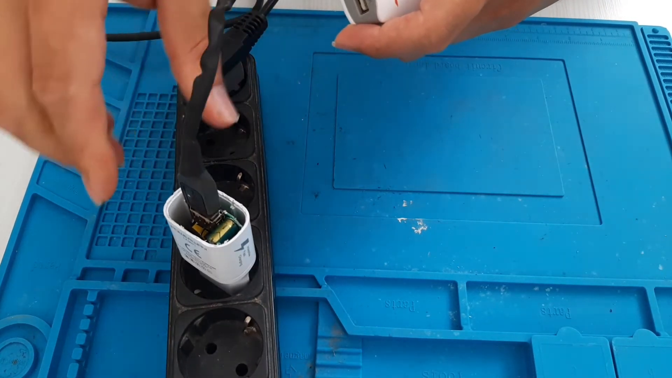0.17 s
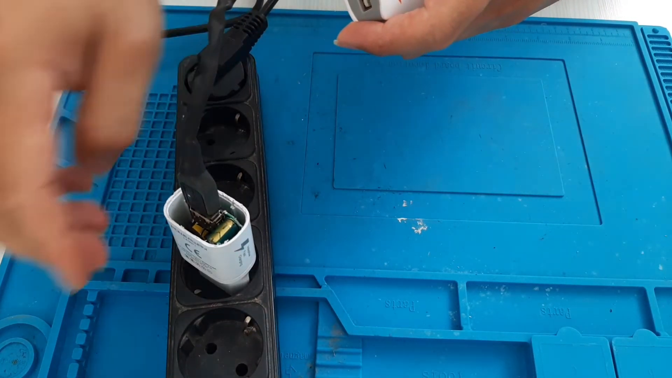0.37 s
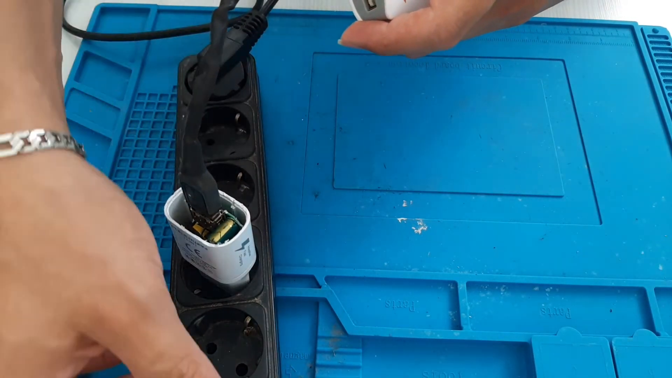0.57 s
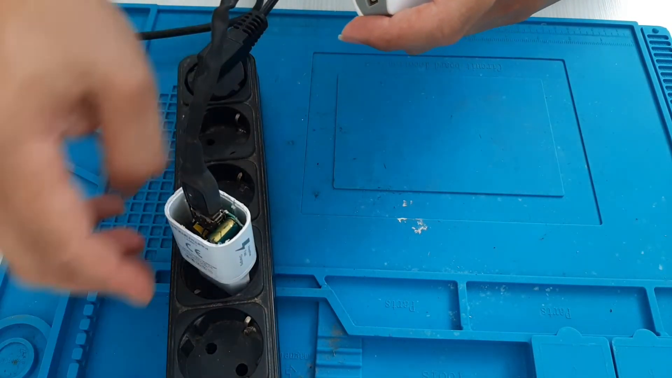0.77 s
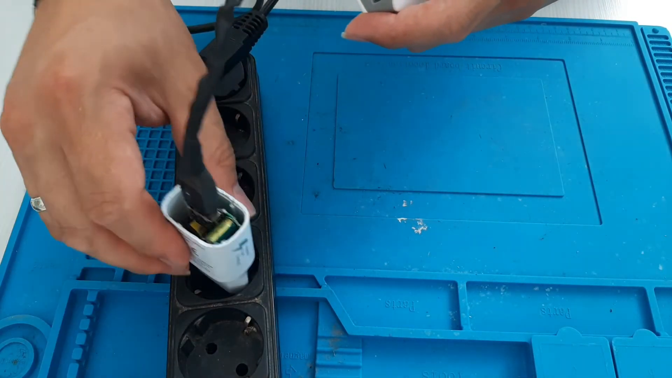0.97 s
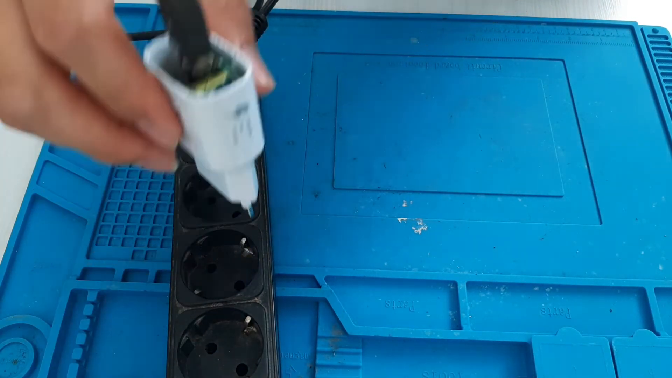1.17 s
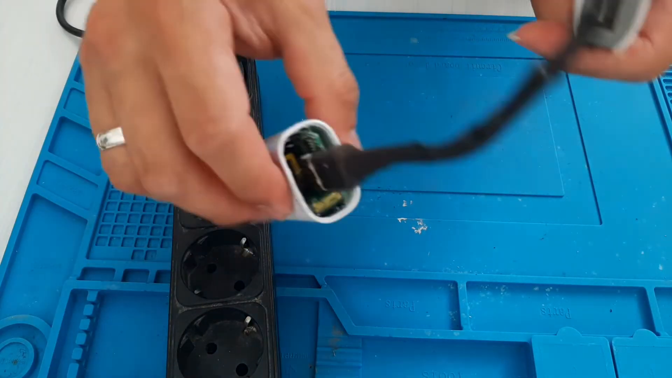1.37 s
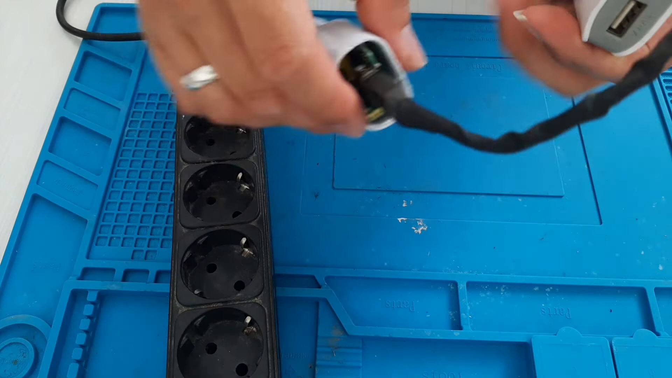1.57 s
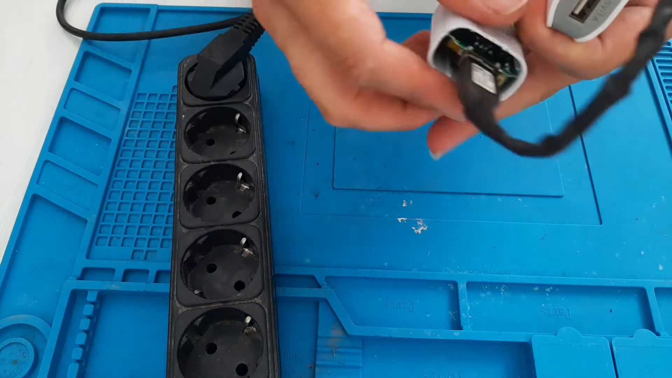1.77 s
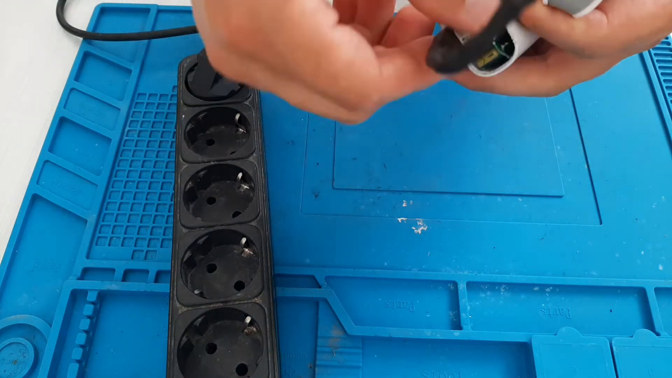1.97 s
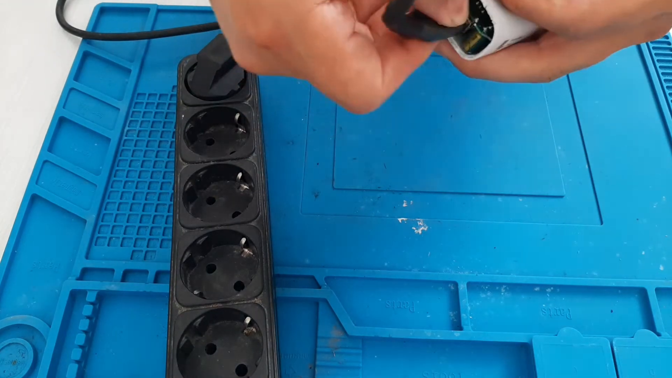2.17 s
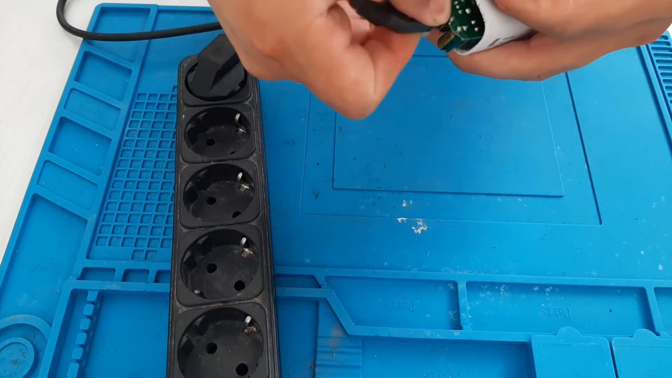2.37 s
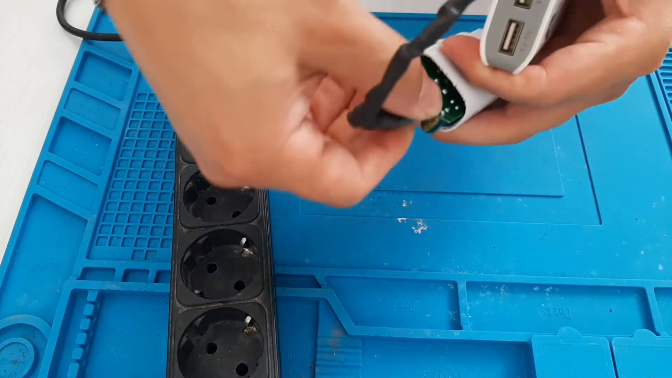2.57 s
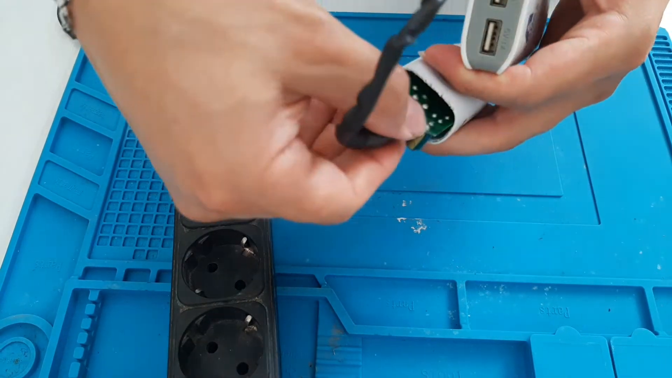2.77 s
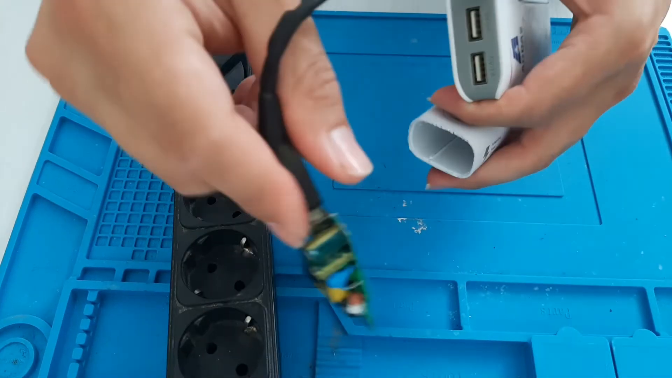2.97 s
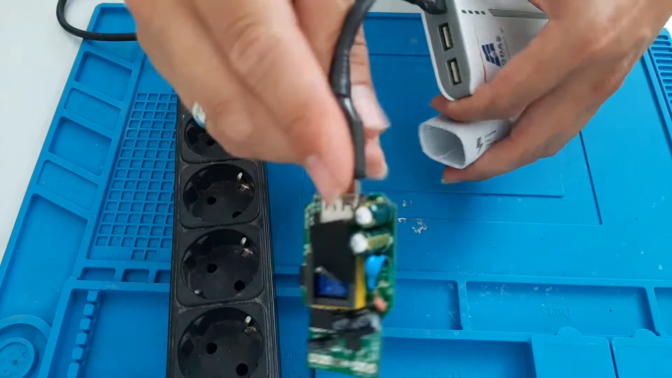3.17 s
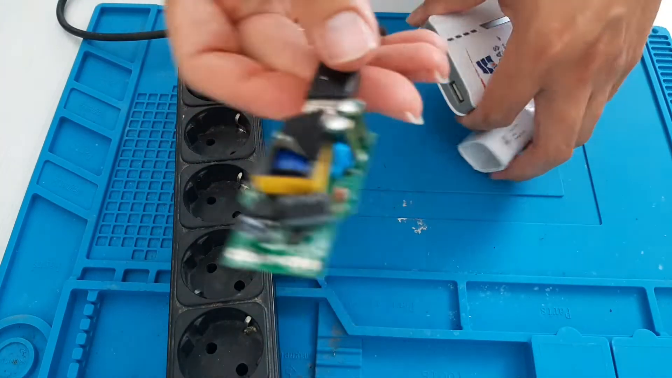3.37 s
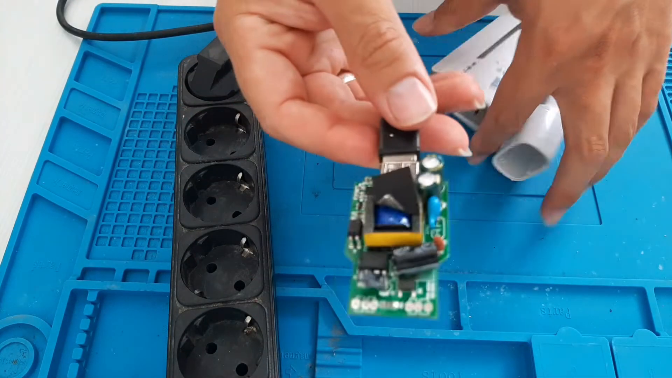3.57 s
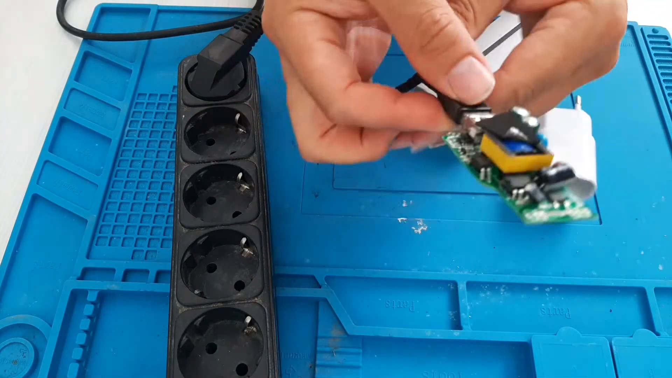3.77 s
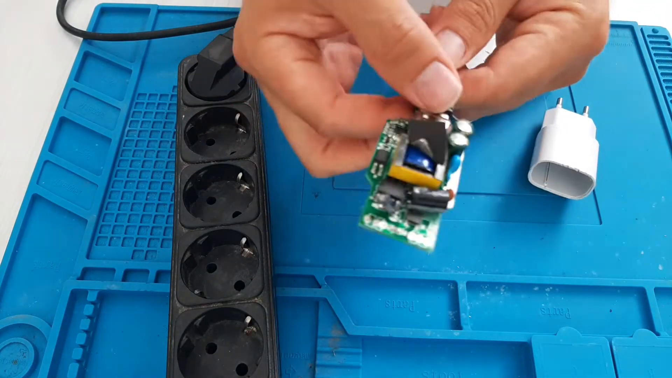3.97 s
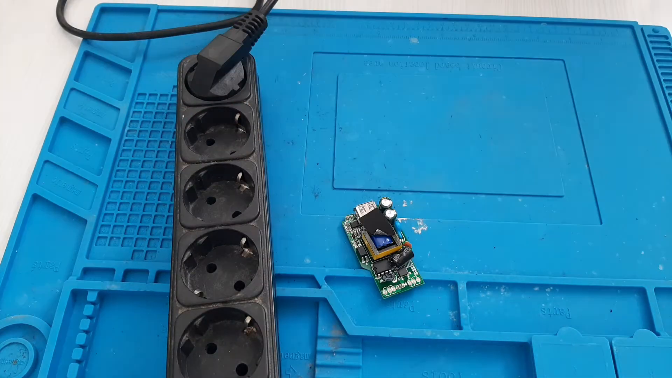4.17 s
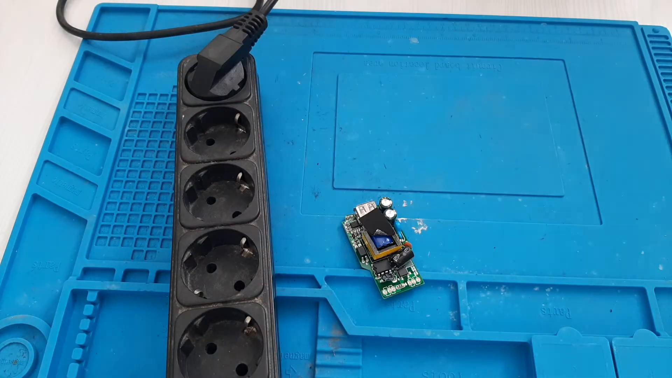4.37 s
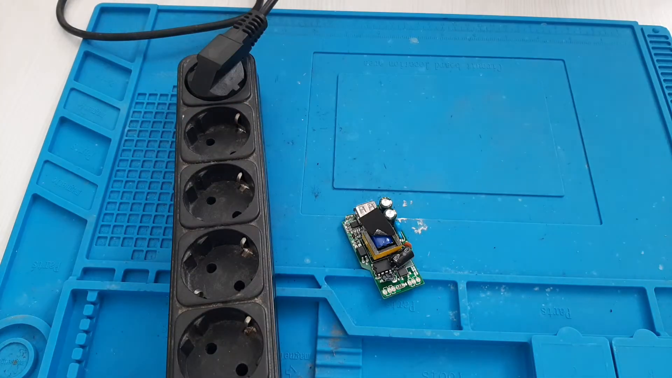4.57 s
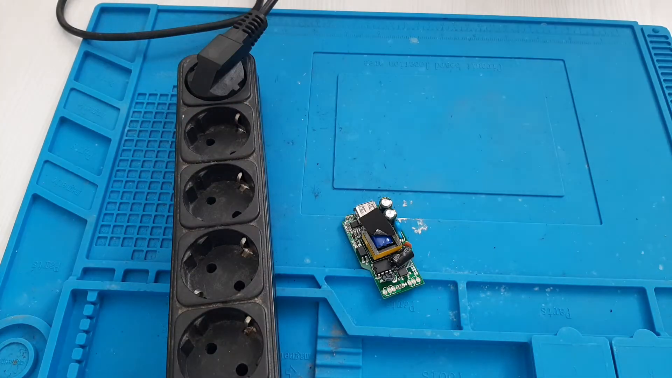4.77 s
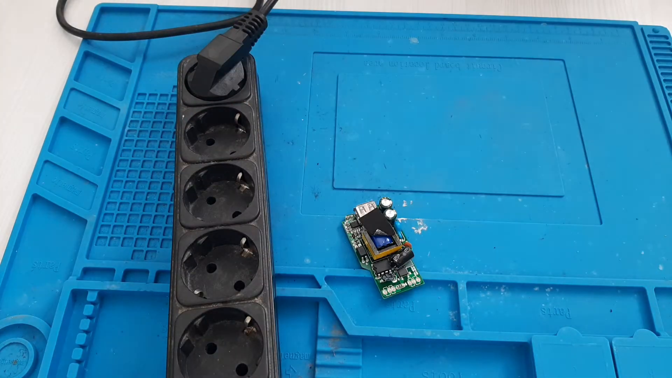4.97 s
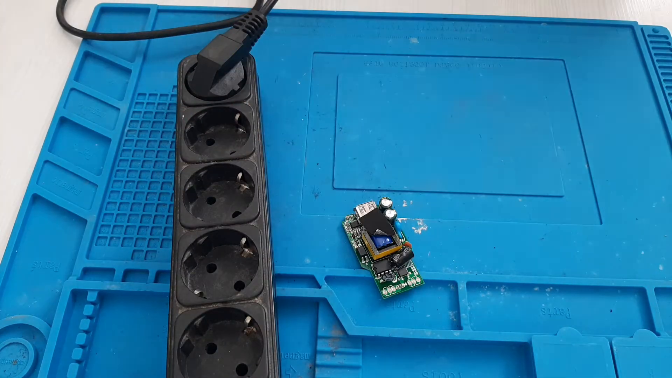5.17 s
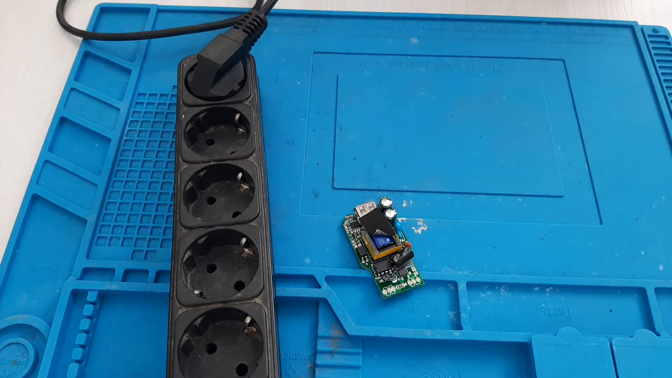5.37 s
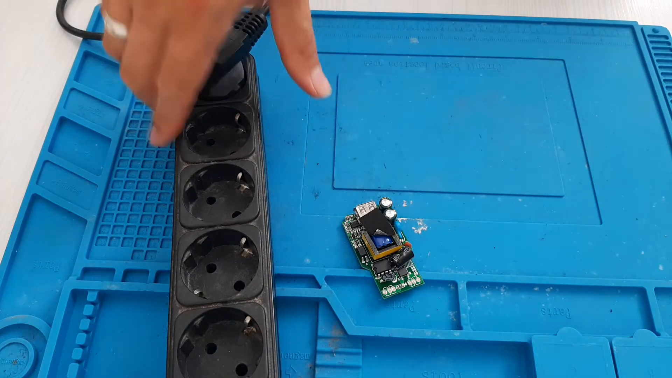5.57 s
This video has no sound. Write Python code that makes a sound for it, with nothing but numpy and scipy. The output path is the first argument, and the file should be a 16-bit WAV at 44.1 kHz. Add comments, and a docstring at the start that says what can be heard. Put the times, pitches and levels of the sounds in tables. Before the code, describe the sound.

Close up in a quiet room, a small charger sizzles with a thin, high electrical noise for about a second, then is pulled from a power strip with a scrape and click. Faint handling ticks follow, then sharp hollow plastic clacks as the board leaves its case. The case is set down with ringing knocks and soft bumps, and the board lands with hard clicks. A two-microphone phone picks it up with short room echoes.

```python
"""The hollow plastic case of a small charger and its circuit board are tapped, scraped and set down
on a bench: rough noise bursts and gritty noise drive resonances of cavity, shell, board and bench.
Before that the charger sizzles in a power strip until it is pulled out: noise coloured by its parts.
Soft bench bumps, a brief low hum, room echoes and room tone lie beneath, all heard close to a
two-microphone phone in a quiet room."""
import sys
import numpy as np
from scipy import signal
from scipy.fft import rfft, irfft
from scipy.io import wavfile
from scipy.ndimage import uniform_filter1d

SR = 44100
rng = np.random.default_rng(int(sys.argv[2]) if len(sys.argv) > 2 else 0)


def int16_out(signal):
    """Quantize to a 16-bit WAV file."""
    q = np.round(np.clip(np.atleast_2d(signal).T, -1, 1) * 32767)
    wavfile.write(sys.argv[1], SR, q.astype(np.int16))


N = 248402
T = np.arange(N) / SR
SIDES = np.array([[.5], [-.5]])  # shares a left-minus-right level [dB] between the two microphones


def undb(db):
    """Amplitude factor of a level in dB."""
    return 10 ** (np.asarray(db) / 20)


def unit(x):
    """Scale to an overall RMS of 1."""
    return x / np.sqrt(np.mean(x ** 2))


def peak(x, db):
    """Scale so that the highest peak lies 1 dB above the given level."""
    return x * undb(db + 1.0) / np.abs(x).max()


def band(x, lo_hz, hi_hz):
    """Gentle band-pass."""
    return signal.sosfilt(signal.butter(2, [lo_hz, hi_hz], "band", fs=SR, output="sos"), x)


def ring(x, modes):
    """Sum of decaying resonances (frequency [Hz], gain [dB], t60 [s]) driven by x."""
    out = 0
    for hz, db, t60 in modes:
        radius = 1000 ** (-1 / (max(t60, 1 / 1000) * SR))
        angle = 2 * np.pi * hz / SR
        resonance = signal.lfilter([1], [1, -2 * radius * np.cos(angle), radius * radius], x)
        out = out + undb(db) * np.sin(angle) * resonance
    return out


def walk(rate):
    """Random levels held for 1 / rate seconds and smoothed twice; spread near 1."""
    hold = int(SR / rate)
    steps = np.repeat(rng.standard_normal(N // hold + 1), hold)
    return 1.3 * uniform_filter1d(uniform_filter1d(steps, hold), hold)[:N]


def tinted(gain):
    """Unrelated noise for each microphone, with gain(Hz) as its colour."""
    hz = np.arange(N // 2 + 1) * SR / N + 1
    return unit(irfft(rfft(rng.standard_normal((2, N))) * gain(hz), N))


def hands(s):
    """Where the hands work at time s: pan and share sent to the room, both in dB."""
    # hand places: (time [s], left minus right [dB], share sent to the room [dB])
    places = [(1.02, 3, -49), (1.25, 7, -15), (2.2, -3, -11.5), (2.388, -3.5, -28), (2.88, -1.5, -35),
              (3.12, 4.5, -21), (3.601, -0.5, -28.5), (4.15, 1, -13), (4.3, -5.5, -5.5), (4.52, -9, -0.5),
              (4.9, 2.5, -9.5), (5.27, -4, -6), (5.36, -8, -1), (5.47, -10.5, -6.5)]
    when, pan_db, room_db = np.transpose(places)
    return np.interp(s, when, pan_db), np.interp(s, when, room_db)


def air():
    """Room tone: a swelling and sinking building rumble under a nearly steady hiss."""
    # relative colour of the room tone: (frequency [Hz], level [dB per Hz])
    air_colour = [(15, -25), (25, -15.5), (49, -11.5), (137, -1.5), (335, -3.5), (818, -10.5),
                  (1290, -10.5), (3080, -14.5), (7510, -17.5), (8590, -17.5), (14800, -14.5), (16000, -7)]
    # the rumble of the building swells and sinks: (time [s], level [dB])
    rumble_levels = [(0.0, -55.5), (0.48, -74.5), (0.9, -62), (1.1, -79.5), (3.3, -81.5), (4.2, -67.5),
                     (4.55, -62), (4.9, -62), (5.63, -64.5)]
    hz, db = np.transpose(air_colour)
    tone = tinted(lambda f: undb(np.interp(np.log(f), np.log(hz), db)))
    tone_db = -56 + 1.0 * walk(1.5)
    rumble_db = np.interp(T, *np.transpose(rumble_levels)) + 1.2 * walk(2.1)
    rumble = unit(band(rng.standard_normal((2, N)), 61, 170)) * undb(rumble_db)
    return undb(tone_db) * tone + rumble


def room(x):
    """Diffuse echoes as decaying noise, unrelated left and right; low and treble bands decay alike."""
    low_t60_s, treble_t60_s = 0.28, 0.29
    t = np.arange(SR // 2) / SR
    low, high = rng.standard_normal((2, 2, len(t)))
    low_tail = band(low, 300, 3000) * 1000 ** (-t / low_t60_s)
    treble_tail = 0.52 * band(high, 2100, 16000) * 1000 ** (-t / treble_t60_s)
    # silent for 4 ms, then the echoes build up over 9.1 ms
    tail = (low_tail + treble_tail) * np.clip((t - .004) / 0.0091, 0, 1)
    return signal.fftconvolve(x[None], tail / np.sqrt(np.sum(tail[0] ** 2)), axes=1)[:, :N]


def hum():
    """One soft low sine that glides slightly in pitch and dies away."""
    # the hum: (time [s], frequency [Hz], RMS level [dB])
    hum_course = [(0.0, 126.7, -55.5), (0.387, 133.4, -67.5), (0.45, 129, -93)]
    s, hz, db = np.transpose(hum_course)
    phase = 2 * np.pi * np.cumsum(np.interp(T, s, hz)) / SR
    return np.sqrt(2) * undb(np.interp(T, s, db, right=-120)) * np.sin(phase)


def charger():
    """Sizzling noise, coloured by resonances of the parts, strongest in the high treble."""
    # resonances of coil, capacitors and case: (frequency [Hz], width [Hz], relative level [dB])
    part_modes = [(3540, 110, -18.5), (6540, 163, -15), (7510, 630, -20), (9200, 480, -11.5),
                  (10300, 140, -7), (11180, 140, -1), (12200, 670, -0.5), (12900, 280, -7),
                  (14200, 490, -11), (14800, 850, -9), (15100, 610, -6)]
    # the coil sizzle until unplugging: (time [s], level [dB])
    sizzle_levels = [(0.0, -30.5), (0.228, -34), (1.01, -33.5), (1.036, -35), (1.07, -67)]
    # the switching pauses briefly: (time [s], depth [dB], length [ms])
    sizzle_pauses = [(0.142, -8, 6.7), (0.186, -35, 6.4)]
    pan_db = 4.5  # left minus right

    def colour(f):
        power = sum(undb(2 * db) / (1 + (2 * (f - hz) / width) ** 2) ** 1.21 for hz, width, db in part_modes)
        return np.sqrt(power)

    noise = tinted(colour)
    s, db = np.transpose(sizzle_levels)
    pause_db = sum(depth_db * np.exp(-((T - t0) * 2000 / ms) ** 2) for t0, depth_db, ms in sizzle_pauses)
    level_db = np.interp(T, s, db, right=-120) + pause_db + 1.0 * walk(40)
    return noise * undb(level_db + SIDES * pan_db)


def bumps():
    """Soft pushes ring low modes of the bench, tuned a little differently each time."""
    # soft bumps carried by the bench: (time [s], level [dB]); peak() adds 1 dB
    bump_levels = [(3.457, -36), (3.545, -35.5), (3.592, -35), (3.674, -39), (3.702, -39.5), (3.744, -46),
                   (3.81, -44), (3.872, -41.5), (4.499, -45.5), (4.926, -55), (5.521, -53), (5.541, -43),
                   (5.576, -54), (5.603, -59)]
    # lowest bench modes before detuning: (frequency [Hz], gain [dB], t60 [s])
    thud_modes = [(134.5, -2.5, 0.17), (176.5, -5.5, 0.071)]
    out, t = np.zeros(N + 7000), np.arange(7000) / SR
    push = t * np.exp(-t / 0.00095)
    for s, db in bump_levels:
        detune = 1 + 0.12 * rng.standard_normal(len(thud_modes))
        modes = [(hz * d, gain_db, t60) for (hz, gain_db, t60), d in zip(thud_modes, detune)]
        out[int(s * SR):][:len(t)] += peak(band(ring(push, modes), 180, 482), db)
    return out[:N]


def scrapes():
    """Dense uneven slips excite cavity and shell; treble comes straight from the rubbing."""
    # scrapes and slides: (full from [s], rise [ms], hold [ms], fall [ms], cavity [dB], cavity [Hz],
    # cavity ring t60 [ms], shell [dB], shell [Hz], treble [dB]); layer levels are RMS before the swell
    slides = [(0.97, 100, 36, 16, -56, 870, 3.8, -48.5, 2700, -51),
              (1.015, 24, 10.7, 42.5, -35.5, 900, 9.8, -27, 2900, -42.5),
              (1.42, 60, 11, 35, -64.5, 1900, 6.7, -71, 4020, -69),
              (2.372, 14.6, 10.3, 42.7, -22, 1450, 11, -18, 3800, -29),
              (2.445, 15.6, 15, 38, -32.5, 1456, 63, -46, 4100, -50),
              (2.76, 24, 69, 27, -50.5, 1404, 26, -52.5, 3950, -54),
              (2.832, 11.9, 14.5, 40, -18.5, 1450, 29.6, -13.5, 4123, -24),
              (2.885, 18, 2.3, 55, -32, 1424, 26, -35, 3950, -33.5),
              (3.112, 18, 5.5, 10, -59, 2410, 8.7, -54, 4320, -48),
              (3.321, 17, 7.3, 46, -65, 1505, 4.3, -60, 4140, -45.5),
              (3.45, 84, 24, 74, -48.5, 1440, 7.5, -56, 2960, -59),
              (3.508, 19.7, 15, 80, -37, 1380, 10.7, -39, 2940, -48),
              (3.6, 27, 6.1, 32, -58, 1400, 13.5, -35, 3110, -58),
              (3.92, 120, 120, 66, -72, 1510, 5.1, -65.5, 4570, -62),
              (4.148, 9.3, 1.6, 67, -35.5, 1580, 5.8, -38, 4280, -50),
              (4.26, 125, 42, 18, -58, 1460, 4.2, -63, 4100, -44),
              (5.04, 320, 56, 115, -60.5, 1510, 6.3, -58, 5540, -44),
              (5.37, 63, 3, 50, -40, 1206, 14, -47.5, 3050, -45.5)]
    swell_step_db = -30  # level gained over the rise time and lost over the fall time
    shell_ring_ms = 27  # a loosely held case rings longer, the shell most: t60 = cavity t60 ** 2 / this
    grit_db = 1.5 * rng.exponential(size=N) + 3.0 * walk(400)
    grit = rng.standard_normal((2, N)) * undb(grit_db)
    # the right microphone shares part of the left one's grit
    grit[1] += 0.27 * grit[0]
    grit[1] /= grit[1].std() / grit[0].std()
    out = np.zeros((2, N))
    for s, *ms, cavity_db, cavity_hz, ring_ms, shell_db, shell_hz, treble_db in slides:
        rise, hold, fall = np.maximum(ms, 1) / 1000
        span = slice(int((s - 2 * rise) * SR), int((s + hold + 2 * fall) * SR))
        x, t = grit[:, span], T[span]
        cavity = band(ring(x, [(cavity_hz, 0, ring_ms / 1000)]), 500, 3200)
        shell_ring = ring(x, [(shell_hz, 0, ring_ms ** 2 / shell_ring_ms / 1000)])
        shell = unit(band(shell_ring, 1200, 7100)) + .5 * unit(band(x, 3700, 7500))
        treble = band(x, 3700, 12000)
        layers = [(cavity, cavity_db), (shell, shell_db), (treble, treble_db)]
        sound = sum(unit(layer) * undb(db) for layer, db in layers)
        swell_db = swell_step_db * np.maximum(np.maximum((s - t) / rise, (t - s - hold) / fall), 0)
        out[:, span] += undb(swell_db + SIDES * hands(s)[0]) * sound
    return out


def taps():
    """Each rough contact rings cavity, shell, board and bench; returns direct sound and room share."""
    # taps: (time [s], cavity [dB], cavity [Hz], cavity ring t60 [ms], shell [dB], crack [dB], bench [dB]);
    # peak() adds 1 dB to each layer
    tap_list = [(1.0168, -17, 2050, 12, -21.5, -33, -32), (1.0285, -21.5, 2440, 7.9, -18, -29, -48),
                (1.1962, -56, 1450, 15, -52, -57, -75), (1.2492, -48.5, 1380, 83, -47.5, -39, -68),
                (1.295, -45.5, 1447, 39, -74, -42.5, -80), (1.38, -62, 1390, 30, -62, -59, -75),
                (1.506, -57, 1430, 57, -59.5, -51.5, -75), (1.5464, -57, 1400, 43, -62, -67, -81),
                (1.5947, -53, 1940, 8.8, -55, -51, -57.5), (1.6704, -53.5, 1950, 16, -48, -44, -72),
                (1.7353, -48, 1510, 24, -50.5, -43.5, -89), (1.799, -58, 1380, 24, -54.5, -54, -72),
                (1.875, -51.5, 1430, 14, -48.5, -46.5, -79), (2.0562, -56, 1400, 34, -56, -55, -80),
                (2.1078, -45.5, 1380, 25, -44.5, -49.5, -54), (2.187, -49, 1320, 23, -43.5, -39.5, -67),
                (2.2339, -47.5, 1440, 23, -42, -40, -74), (2.275, -60, 1450, 35, -72, -65, -75),
                (2.3213, -49.5, 1350, 30, -46.5, -70, -72), (2.3844, -7.5, 1350, 21, -8.5, -17, -28),
                (2.456, -24, 1400, 41, -16, -23.5, -34.5), (2.572, -58.5, 1410, 50, -78, -75, -75),
                (2.7557, -42, 1445, 68, -37, -45.5, -49.5), (2.7964, -51, 1410, 46, -28.5, -41, -60.5),
                (2.8872, -14.5, 1463, 42, -9.5, -19, -45.5), (3.0612, -48, 1700, 9.1, -47.5, -47, -87),
                (3.119, -53, 1595, 25, -24, -24, -49.5), (3.3056, -60, 1910, 20, -32, -28, -56),
                (3.46, -25, 1244, 15, -24, -33, -28.5), (3.5087, -19.5, 1370, 12, -14, -28.5, -54),
                (3.5494, -22.5, 1336, 110, -21.5, -38.5, -24), (3.5665, -51, 1300, 34, -37.5, -54.5, -23),
                (3.5943, -11, 1453, 42, -15, -34.5, -27.5), (3.664, -69, 1444, 30, -75, -82, -38),
                (3.678, -33, 1505, 37, -47, -62, -18), (3.7025, -60, 1450, 34, -61, -57, -29),
                (3.8127, -44, 1386, 66, -82, -70.5, -34.5), (3.832, -63, 1433, 34, -82, -84, -42.5),
                (3.862, -48, 1437, 40, -75, -87, -55), (3.879, -41.5, 1440, 55, -54, -79, -35.5),
                (3.905, -56, 1450, 26, -75, -72, -53), (4.145, -23.5, 1340, 20, -59, -57, -44),
                (4.2985, -7, 1830, 9.5, -13, -12, -14), (4.5156, -19, 1100, 9.3, -10.5, -9.5, -17),
                (4.594, -28.5, 1340, 2.7, -29.5, -35, -32), (4.8921, -39, 1506, 26, -75, -63, -53),
                (5.2505, -53, 1420, 9.4, -43, -50, -50), (5.2603, -27.5, 1467, 45, -54, -39, -71.5),
                (5.3335, -28, 1454, 57, -35, -38, -64), (5.3535, -34, 1526, 38, -78, -28, -82),
                (5.364, -39, 1180, 8.8, -35.5, -45, -50.5), (5.47, -26, 1502, 50, -47, -45, -69.5)]
    # bench modes before detuning and hardness tilt: (frequency [Hz], gain [dB], t60 [s])
    bench_modes = [(370, -4, .025), (480, -1, .025), (650, 0, .018), (850, 0, .015), (1080, 0, .015)]
    contact_ms, contact_ms_per_db = 2.6, -0.1  # harder blows are shorter
    soft_ms_per_db, soft_top_hz = 0.0539, 750  # a soft contact lasts longer and leaves the bench dull
    rattle_db, rattle_length = -19.5, 3.07  # loose parts chatter on; decay constant in contact times
    # a tube closed at one end also rings near three times its note
    cavity_split, overtone, overtone_db = 0.027, 2.879, -6
    ping_hz_per_db = 40.5  # a touch that sounds the cavity more than the shell is purer
    hard_tilt = 1  # dB per octave for each dB that the crack gains on the bench
    board_hz, board_t60_s, board_db = 7470, 0.012, -6  # a high mode that colours each crack
    pan_scatter_db = 1

    near, far, t = np.zeros((2, N + 7000)), np.zeros(N + 7000), np.arange(7000) / SR
    for s, cavity_db, hz, ring_ms, shell_db, crack_db, bench_db in tap_list:
        noise = rng.standard_normal((3, len(t)))
        detune = 1 + 0.01 * rng.standard_normal(len(bench_modes))
        pan_db, room_db = hands(s)
        soft_db = np.clip(bench_db - crack_db, -20, 40)
        loudest_db = max(cavity_db, shell_db, bench_db)
        ms = max(contact_ms + contact_ms_per_db * loudest_db + soft_ms_per_db * soft_db, .5)
        u = t / (ms / 1000)  # time in contact lengths
        rattle = undb(rattle_db) * np.exp(-u / rattle_length) / (1 + u ** 2)
        push = u ** 2 * (8 * np.exp(-4 * u) + rattle)
        # the two microphones hear the rough part of the contact differently
        touch = push * (noise[0] + .5 * noise[1:])

        pair = [(hz, 0, ring_ms / 1000), (hz * (1 + cavity_split), -7.0, 0.44 * ring_ms / 1000)]
        purity_db = np.clip(cavity_db - shell_db, 0, 25)
        cavity = band(ring(touch, pair), 1400, 3132 - ping_hz_per_db * purity_db)

        overtone_ring = ring(touch, [(overtone * hz, 0, 0.17 * ring_ms / 1000)])
        shell = peak(band(touch, 3280, 8500), 0) + peak(overtone_ring, overtone_db)
        shell = band(shell, 1900, 5700)

        board = band(ring(touch, [(board_hz, 0, board_t60_s)]), 5000, 10000)
        crack = peak(band(touch, 5500, 14500), 0) + peak(board, board_db)

        # a hard contact cracks loudly and also reaches the higher modes of the bench
        tilt_db = hard_tilt * np.clip(crack_db - bench_db + 5.5, -25, 22)
        modes = [(f * d, db + tilt_db * max(np.log2(f / 480), 0), t60)
                 for (f, db, t60), d in zip(bench_modes, detune)]
        top_hz = np.interp(soft_db, [5, 25], [1500, soft_top_hz])
        bench = band(band(ring(touch, modes), 330, top_hz), 330, top_hz)

        layers = [(cavity, cavity_db), (shell, shell_db), (crack, crack_db), (bench, bench_db)]
        sound = sum(peak(layer, db) for layer, db in layers)
        i = int((s - ms / 4000) * SR)  # contact begins a quarter of its length early
        near[:, i:i + len(t)] += sound * undb(SIDES * (pan_db + pan_scatter_db * rng.standard_normal()))
        far[i:i + len(t)] += sound[0] * undb(room_db)
    return near[:, :N], far[:N]


def scene():
    """Sum all sources; handling sounds reach the left microphone late and feed the room."""
    # lag of the left microphone: (time [s], delay [ms])
    left_lag = [(2.9, 0), (3.6, 0.11), (4.15, 0.32)]
    scrape_room_db = -3
    tapped, far = taps()
    rubbed = scrapes()
    handled = tapped + rubbed
    late = np.round(np.interp(T, *np.transpose(left_lag)) * SR / 1000).astype(int)
    handled[0] = handled[0, np.arange(N) - late]
    to_room = far + undb(scrape_room_db + hands(T)[1]) * rubbed[0]
    return air() + room(to_room) + hum() + charger() + bumps() + handled


def record(dry):
    """The microphone port has a dip in the treble; the phone rounds the peaks and cuts the top."""
    notch_hz, notch_width_hz, notch_depth = 9030, 1500, 0.33  # depth as share of amplitude removed
    top_hz = 15480
    resonance = signal.lfilter(*signal.iirpeak(notch_hz, notch_hz / notch_width_hz, SR), dry)
    rounded = np.tanh(dry - notch_depth * resonance)
    return signal.sosfilt(signal.ellip(10, .2, 70, top_hz, fs=SR, output="sos"), rounded)


dry = scene()
out = record(dry)
int16_out(out)
```